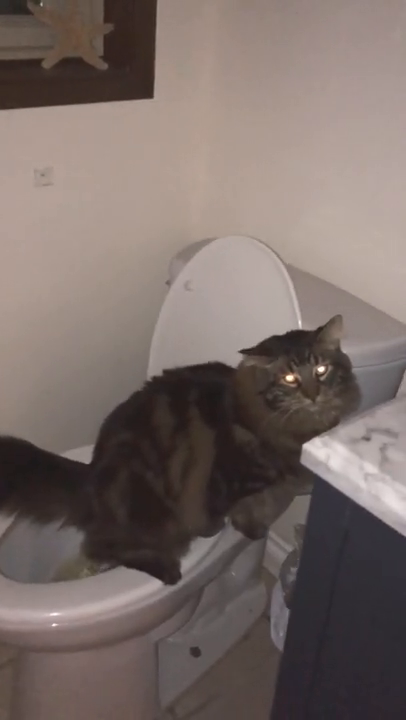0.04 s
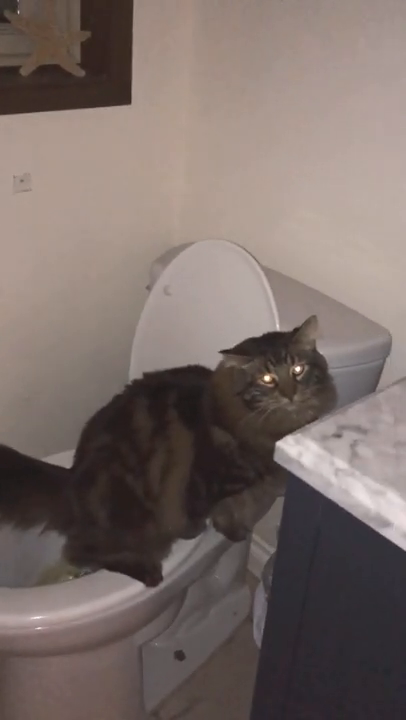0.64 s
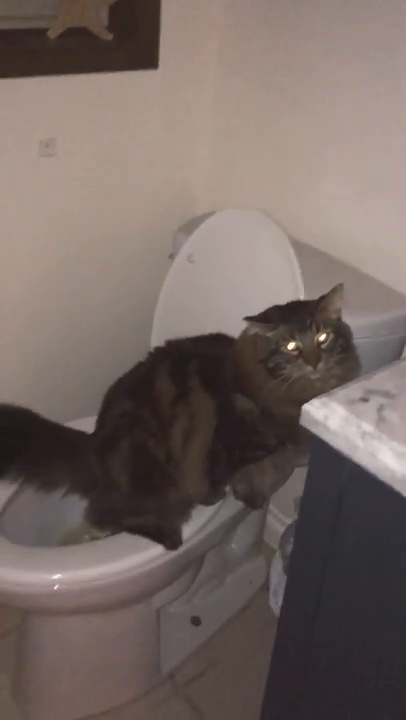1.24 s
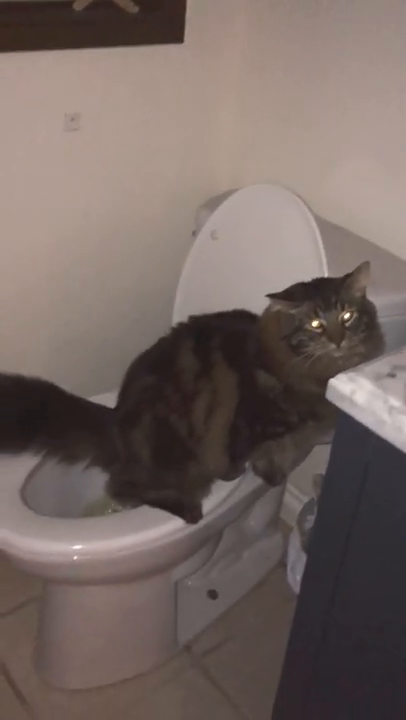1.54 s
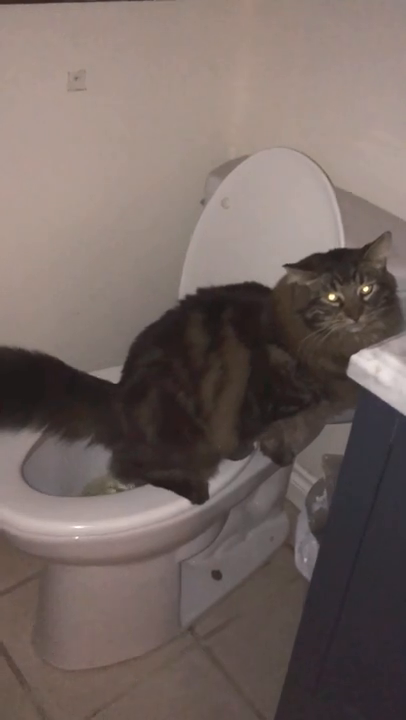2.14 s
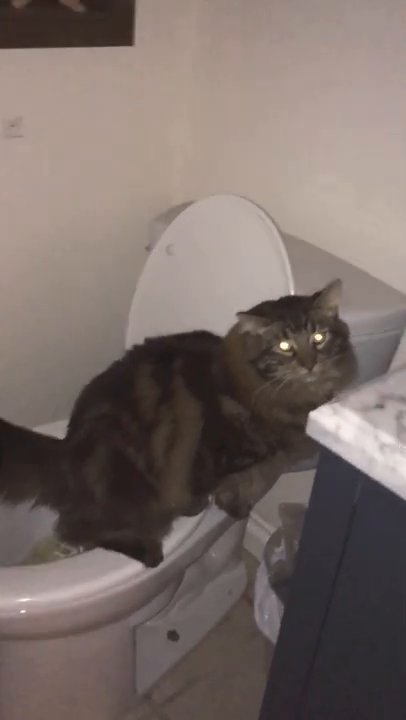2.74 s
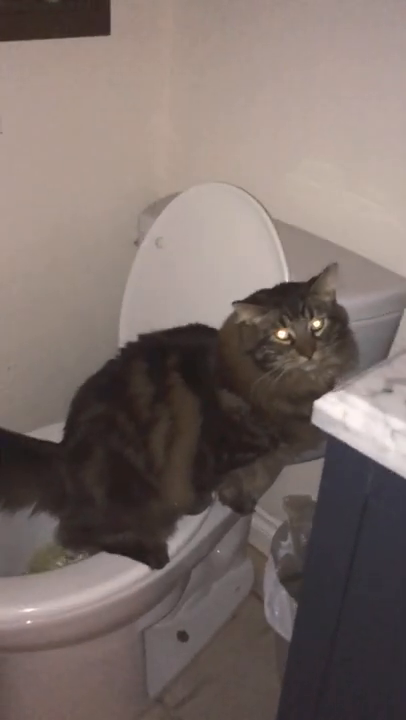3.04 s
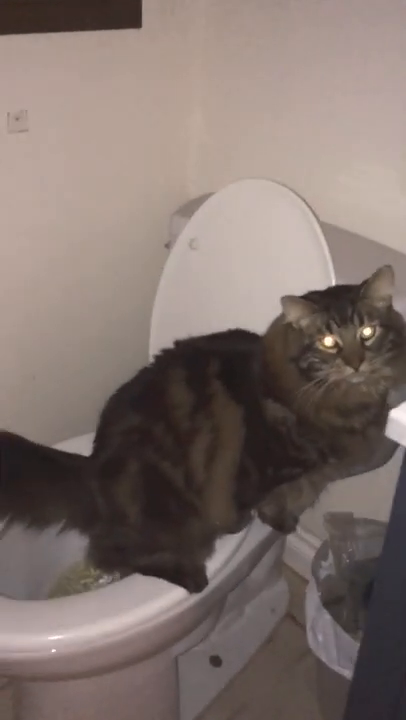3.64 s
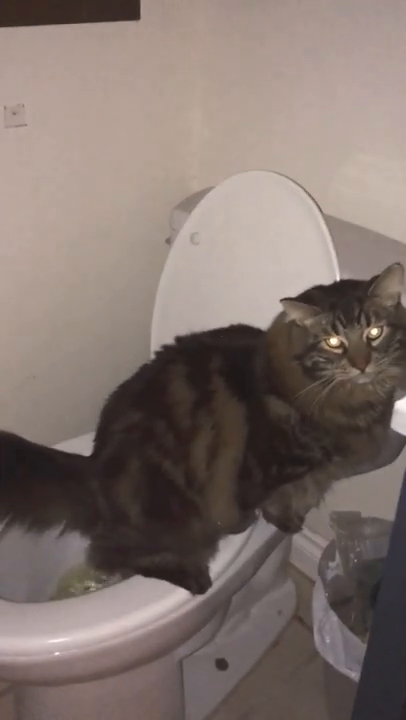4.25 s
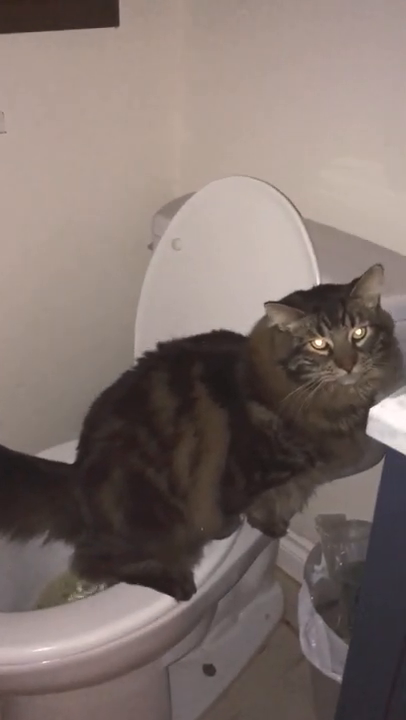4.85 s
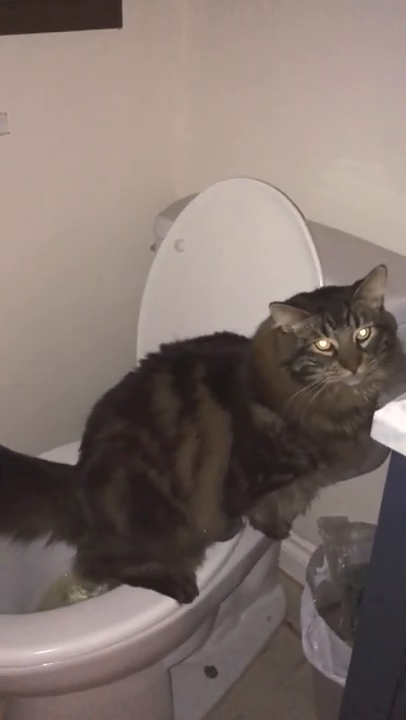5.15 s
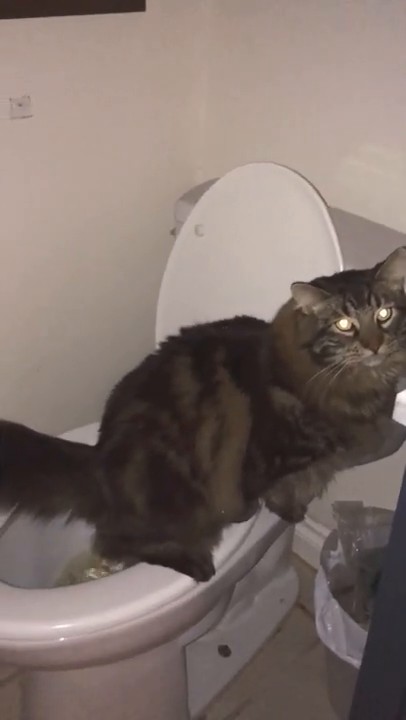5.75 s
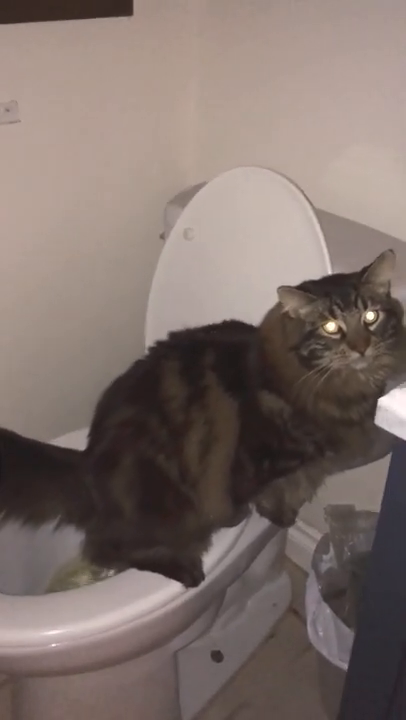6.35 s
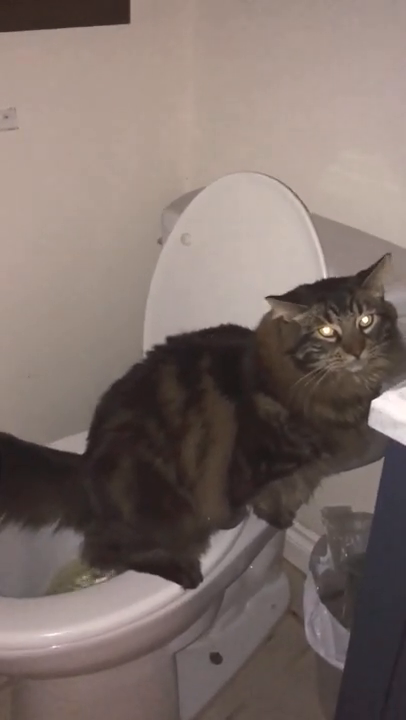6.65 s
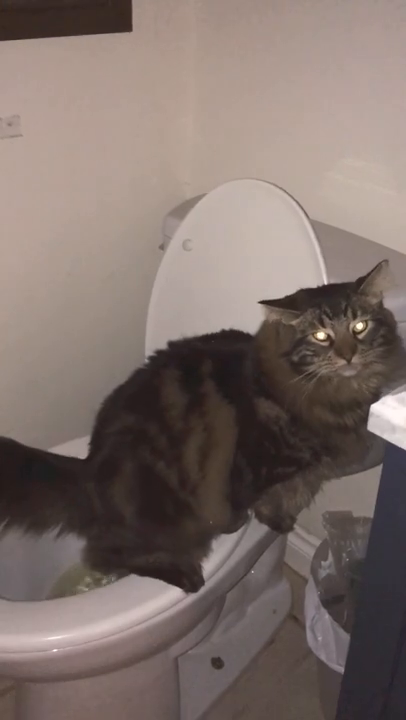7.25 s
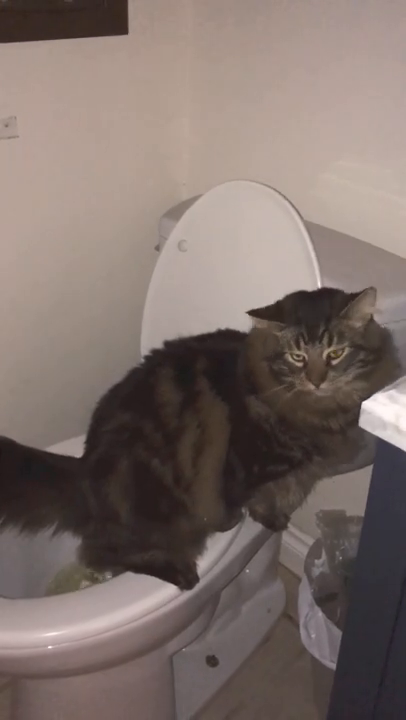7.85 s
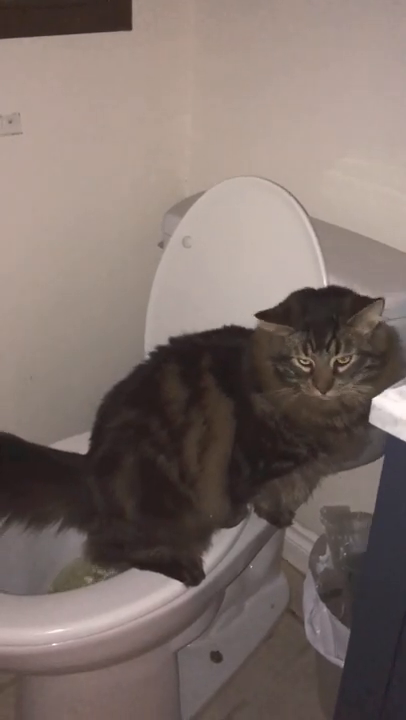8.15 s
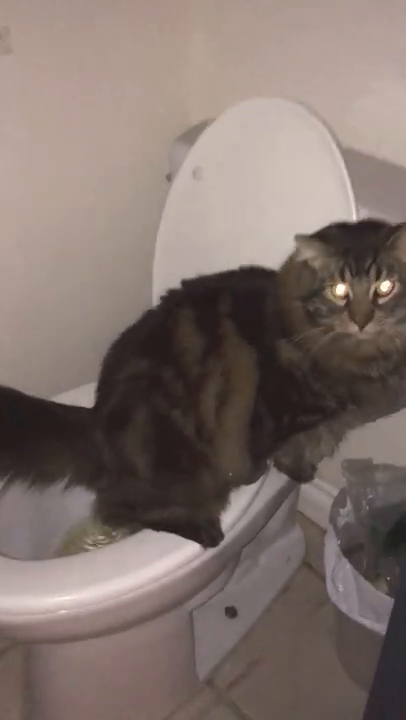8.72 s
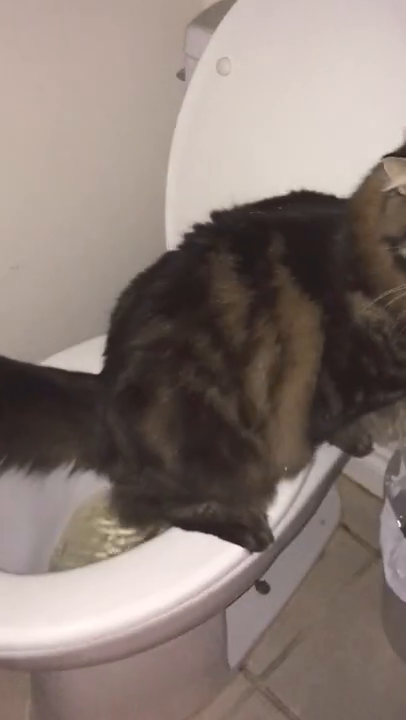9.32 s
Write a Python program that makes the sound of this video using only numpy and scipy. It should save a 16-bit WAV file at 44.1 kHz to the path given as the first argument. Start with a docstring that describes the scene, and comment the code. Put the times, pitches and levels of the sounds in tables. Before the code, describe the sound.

A cat pees into a toilet, a thin stream trickling, gurgling and ticking on the water in a small echoing bathroom.

```python
"""Water trickles, gurgles and ticks: a cat is peeing into a toilet in a small tiled bathroom.
The thin stream drags under strings of bubbles that ring and climb in pitch, and it breaks into
drops that tick on the water. The porcelain bowl and the walls echo it all over a faint room rumble.
A few dull knocks come through, and near the end something rustles softly.
We hear it from a hand-held phone a metre or so away."""
import sys
import numpy as np
from scipy import signal
from scipy.fft import rfft, irfft
from scipy.io import wavfile

SR = 44100
rng = np.random.default_rng(int(sys.argv[2]) if len(sys.argv) > 2 else 0)


def digitize_waveform(pressure):
    """Quantize a signal to 16-bit integers and store it at the path in sys.argv[1].

    Rows of a 2-D input are taken as channels; values are limited to [-1, 1].
    """
    field = np.atleast_2d(pressure).T
    bounded = np.clip(field, -1, 1)
    quanta = np.round(bounded * 32767).astype(np.int16)
    wavfile.write(sys.argv[1], SR, quanta)


N = 418068
TIME = np.arange(N) / SR

# The tone of the stream slapping the water. Each row: frequency in Hz, relative level in dB.
SLAP_TONE = [(700, 11), (1500, 14), (3200, -0.5), (5500, -1), (16000, -28)]
# A large bubble and the string of smaller ones it sheds.
# Each row: start in seconds, length in seconds, rough first pitch in Hz, relative level in dB.
GURGLE_EVENTS = [(0.171, .02, 1150, -43), (0.206, 0.046, 1350, -41.5), (0.357, 0.093, 1384, -49),
                 (0.604, 0.024, 1015, -51), (0.614, 0.047, 1384, -43), (0.72, 0.024, 1450, -42.5),
                 (0.903, 0.026, 1240, -47.5), (0.942, .05, 986, -48.5), (1.164, 0.025, 917, -52.5),
                 (1.265, 0.032, 1120, -42), (1.418, 0.024, 1347, -52), (1.622, 0.046, 1005, -45.5),
                 (1.855, 0.11, 1474, -50.5), (2.013, 0.079, 1270, -45), (2.285, 0.062, 1024, -47.5),
                 (2.617, 0.033, 1200, -51), (2.718, 0.03, 1002, -51), (3.11, 0.022, 1164, -46.5),
                 (3.193, 0.032, 1133, -44.5), (3.366, 0.06, 1286, -48), (3.492, 0.037, 1470, -49),
                 (3.635, 0.057, 944, -48.5), (3.69, 0.041, 1069, -42.5), (3.743, 0.012, 1383, -41.5),
                 (3.882, 0.043, 1390, -42.5), (4.056, 0.03, 1394, -48), (4.145, 0.039, 911, -43.5),
                 (4.328, 0.035, 1220, -47.5), (4.496, 0.09, 1445, -45), (4.593, 0.041, 1046, -37),
                 (4.701, 0.016, 1377, -39), (4.782, 0.03, 1097, -45.5), (5.025, 0.041, 1145, -37),
                 (5.15, 0.063, 877, -46), (5.338, 0.037, 1103, -45), (5.619, 0.053, 1317, -45),
                 (5.752, 0.04, 1190, -46), (5.808, 0.022, 1102, -40.5), (6.0644, 0.047, 1175, -41.5),
                 (6.285, 0.031, 914, -47), (6.429, 0.064, 1058, -44.5), (6.642, 0.029, 1184, -42),
                 (6.977, 0.036, 1097, -48.5), (7.047, 0.027, 1374, -41), (7.173, 0.026, 1144, -46.5),
                 (7.243, 0.025, 1118, -45.5), (7.341, 0.036, 1416, -47.5), (7.412, 0.067, 1151, -40),
                 (7.687, 0.035, 960, -44.5), (7.845, 0.1, 1485, -46.5), (7.988, 0.023, 1430, -45.5),
                 (8.119, 0.05, 1397, -42.5), (8.249, 0.028, 1315, -48), (8.356, 0.091, 1517, -45.5),
                 (8.463, 0.04, 1540, -39), (8.563, 0.034, 1096, -39.5), (8.657, .03, 1124, -41.5),
                 (8.865, 0.031, 1057, -43.5), (9.036, 0.015, 1270, -47), (9.07, 0.078, 1124, -44),
                 (9.252, 0.034, 1020, -47.5), (9.371, 0.013, 1235, -39)]

def gurgles(count=3, climb_octaves=.17, scatter_octaves=0.155, scatter_db=2):
    """The stream slaps the water and drags a bubble under; those it sheds shrink, so the pitch climbs."""
    rings, slaps = np.zeros(N), np.zeros(N)
    for start, length, hz, db in GURGLE_EVENTS:
        add(slaps, start, undb(db + 11) * burst(rng.standard_normal(512), t60=0.00049))
        add(rings, start, plop(hz, db, rng.standard_normal(3)))
        shed_db = db + 9 + 10 * np.log10(length / count)  # longer gurgles shed louder bubbles
        for k, (late, size, strength, *shape) in enumerate(rng.standard_normal((count, 6))):
            along = (k + 1 + 0.1524 * late) / count
            pitch = hz * 2 ** (climb_octaves * along + scatter_octaves * size)
            ring = plop(pitch, shed_db + scatter_db * strength, shape, cycles=55.6, rise=0.23)
            add(rings, start + along * length, ring)
    return rings + colour(slaps, SLAP_TONE)


def froth(pitch_ratio=1.645, gain_db=-13.0, delay_s=0.0051, linger_s=.05):
    """Each gurgle stirs up weak, small bubbles that linger a moment after it."""
    out = np.zeros(N)
    for start, length, hz, db in GURGLE_EVENTS:
        bubbles = swarm(hz * pitch_ratio, db + gain_db, count=8, span_s=min(length + linger_s, .15),
                        octaves=1.16, climb=0.15, cycles=26)
        add(out, start + delay_s, bubbles)
    return out


# Spurts of the stream. Each row: start in seconds, middle pitch in Hz, relative level in dB.
SPURTS = [(0.237, 1860, -41), (0.421, 2150, -44), (0.858, 2050, -50), (1.285, 1960, -54), (2.06, 2290, -55),
          (3.192, 3750, -39.5), (3.7, 2230, -50.5), (4.034, 1680, -46.5), (4.514, 2600, -49.5),
          (4.937, 2500, -47.5), (5.17, 1600, -47), (6.44, 2030, -50), (6.718, 2060, -42),
          (6.866, 2030, -40), (7.049, 2020, -43.5), (7.878, 2330, -47.5), (8.464, 1920, -47.5),
          (8.716, 1870, -41)]

def splashes(gain_db=5):
    """A thicker stretch of the stream churns the water into a swarm of small bubbles."""
    out = np.zeros(N)
    for start, hz, db in SPURTS:
        bubbles = swarm(hz, db + gain_db, count=10, span_s=.028, octaves=0.68, climb=0.73, cycles=32)
        add(out, start, bubbles)
    return out


# The larger drops that hit the water. Each row: start in seconds, pitch of the ping in Hz,
# relative level of the ping in dB, relative level of the tick in dB.
DROP_HITS = [(.072,6100,-49,-53),(.3152,11500,-42.5,-39),(.352,11000,-60,-48),(.415,3930,-50.5,-44.5),(.721,4140,-53,-53.5),(.977,12200,-43,-39.5),
             (1.305,9200,-54,-62),(1.324,12800,-41,-41),(1.987,7200,-53,-49.5),(2.041,3100,-54,-47),(2.065,2740,-48,-49.5),(2.0966,4750,-51.5,-53),
             (2.2503,9600,-47,-49),(2.353,3640,-63,-58),(2.432,2830,-50,-48),(3.0347,3820,-43.5,-50),(3.2108,5780,-39.5,-41.5),(3.487,5930,-52,-48.5),(3.6007,13400,-48,-50),
             (3.855,6750,-51,-56),(3.882,6900,-57,-49.5),(4.1527,6500,-50,-47),(4.311,4470,-54,-49),(4.5386,15000,-48,-57),(4.542,5100,-49,-48),
             (4.603,12600,-57,-46.5),(4.7016,12900,-51,-44),(4.93,8500,-46,-49.5),(5.051,6400,-58.5,-47.5),(5.3994,6800,-54.5,-46.5),(5.4657,8100,-58,-45.5),
             (5.862,3320,-51.5,-51.5),(5.9238,3700,-45.5,-41.5),(6.0646,6750,-65,-45.5),(6.1477,12300,-47,-45),(6.4335,13700,-48.5,-60),(6.446,2860,-57.5,-50),
             (6.5973,4640,-43.5,-51),(6.7574,2930,-58,-48),(6.814,11600,-50,-48),(7.0615,6150,-50.5,-51),(7.089,2780,-56,-60),(7.341,4550,-48.5,-50.5),(7.5294,5840,-44.5,-38),
             (7.8,6500,-48,-49),(7.8423,3300,-50.5,-49.5),(7.9176,7550,-52,-41.5),(7.9803,6100,-48,-44.5),(8.066,4630,-47,-49.5),(8.1735,6200,-59,-56),
             (8.251,3840,-55,-43),(8.3886,3800,-53,-48),(8.636,11200,-54,-58),(8.69,11600,-44.5,-40),(9.2437,11500,-50,-55),(9.2856,10000,-51.5,-62),
             (9.3005,7900,-63,-57),(9.3313,9000,-48,-46.5),(9.372,12900,-57,-47),(9.4663,3920,-47,-43.5)]

def drops(ping_t60_s=0.0022, tick_t60_s=0.0035, snap_delay_s=0.012, snap_db=-6.5):
    """A drop ticks as it lands and leaves a tiny pinging bubble; then its crater snaps shut."""
    out = np.zeros(N)
    noises = rng.standard_normal((len(DROP_HITS), 3, 512))
    for (start, hz, ping_db, tick_db), noise in zip(DROP_HITS, noises):
        ping = bubble(hz, cycles=ping_t60_s * hz, rise=0.0041, swell=2.3)
        add(out, start, undb(ping_db + 29.5) * unit(ping))
        # the smaller the drop, the higher its ping and the thinner its tick
        edges_hz = np.clip([0.62 * hz, 2.98 * hz], 1, SR * .45)
        band = signal.butter(2, edges_hz, "band", fs=SR, output="sos")
        tick, snap = (unit(signal.sosfilt(band, burst(n, tick_t60_s))) for n in noise[:2])
        gain = undb(tick_db + 25.5)
        add(out, start, gain * tick)
        add(out, start + snap_delay_s * np.exp(.5 * noise[2, 0]), gain * undb(snap_db) * snap)
    return out


# Bubbles that ring out alone. Each row: start in seconds, rough pitch in Hz, relative level in dB.
LONE_BUBBLES = [(.025,1273,-51.5),(.253,2920,-45.5),(.296,11000,-44.5),(.445,1140,-47.5),(0.765,9050,-54),(.865,1880,-50),(.885,6300,-55),(1.0,940,-51.5),(1.064,5840,-49.5),
                (1.183,1290,-49.5),(1.374,7600,-48.5),(1.485,2590,-44.5),(1.704,6070,-55),(1.749,10600,-52),(1.935,3600,-53),(2.159,6100,-48),(2.175,1813,-44),
                (2.213,9000,-48.5),(2.245,1416,-49),(2.404,3020,-50.5),(2.459,13800,-44),(2.505,6100,-54),(2.682,4060,-47.5),(2.848,6300,-53),(2.898,11800,-49.5),
                (3.169,10400,-51),(3.241,12600,-41.5),(3.323,4940,-40.5),(3.335,1530,-49),(3.514,9000,-48.5),(3.806,5600,-54.5),(3.9418,9560,-38.5),
                (4.0715,6540,-54),(4.195,5560,-48.5),(4.204,3370,-50.5),(4.283,6600,-54),(4.379,6100,-54.5),(4.455,2550,-55.5),(4.83,9130,-34.5),(4.844,1054,-46.5),
                (5.075,1100,-53),(5.087,13000,-46),(5.099,1550,-41),(5.184,8600,-49),(5.183,1485,-45.5),(5.292,7800,-52),(5.323,9400,-48),(5.451,1400,-45.5),(5.59,1082,-49),
                (5.9236,8600,-37.5),(5.97,3430,-47),(6.101,2910,-44.5),(6.154,5940,-48),(6.247,4320,-50),(6.275,11700,-50),(6.52,2670,-55),(6.597,2870,-46),
                (6.601,1490,-49.5),(6.674,8700,-50.5),(6.729,2690,-47),(6.768,1890,-43.5),(6.9677,12000,-46),(7.03,3570,-51),(7.197,12000,-50),(7.249,2820,-53),(7.455,1007,-44.5),(7.487,4250,-52.5),
                (7.5634,5150,-56),(7.634,4080,-50.5),(7.888,2400,-49),(7.9,5600,-49.5),(8.114,3370,-48.5),(8.296,5800,-50),(8.3495,5500,-50.5),(8.399,1033,-45),(8.527,7400,-52),(8.533,13700,-51),
                (8.62,3570,-50),(8.7876,6500,-45),(9.119,1120,-44.5),(9.202,2680,-55.5),(9.205,5900,-53),(9.269,12600,-53),(9.313,5460,-51)]

def plinks():
    """Single bubbles glide up as they near the surface; the low ones ring longer."""
    out = np.zeros(N)
    for (start, hz, db), shape in zip(LONE_BUBBLES, rng.standard_normal((len(LONE_BUBBLES), 3))):
        add(out, start, plop(hz, db, shape, cycles=42 * np.sqrt(2700 / hz), rise=0.335, gain_db=27))
    return out


# Chirping bubbles. Each row: start and length in seconds, first and last pitch in Hz, level in dB.
SURFACE_BUBBLES = [(4.098, 0.0286, 2550, 3200, -52), (4.933, .034, 1845, 3850, -42)]

def chirps():
    """A bubble caught right at the surface sweeps steeply upward."""
    out = np.zeros(N)
    for start, length, first_hz, last_hz, db in SURFACE_BUBBLES:
        hz = np.geomspace(first_hz, last_hz, int(length * SR))
        envelope = np.sin(np.linspace(0, np.pi, len(hz)))
        add(out, start, undb(db) * envelope * np.sin(2 * np.pi * np.cumsum(hz) / SR))
    return out


# How strong the stream is. Each row: time in seconds, relative level of the fine splashing in dB.
STREAM_STRENGTH = [(0,-58),(2.2,-55),(2.7,-59.5),(4.6,-58),(8.6,-57),(9.48,-56.5)]

def trickle(count, low_hz, high_hz, lean, cycles, rise, scatter_db, gain_db):
    """Many weak bubbles ring, louder when the stream is stronger; `lean` above 1 favours low pitches."""
    out = np.zeros(N)
    for when, size, strength in rng.random((count, 3)):
        start = when * N / SR
        hz = low_hz * (high_hz / low_hz) ** (size ** lean)
        db = curve(STREAM_STRENGTH, start) + gain_db + scatter_db * (strength ** 2 - 0.5)
        add(out, start, undb(db) * bubble(hz, cycles, rise))
    return out


# The bright tone of the spray. Each row: frequency in Hz, relative level in dB.
SPRAY_TONE = [(1000, -3), (3000, -23), (5000, -14.5), (8500, 3.5), (16000, 9)]

def spray(count=2000, scatter_db=19, gain_db=19):
    """Fine droplets fall back and prickle on the water."""
    clicks = np.zeros(N)
    when, strength = rng.random((count, 2)).T
    clicks[(when * N).astype(int)] = undb(scatter_db * (strength ** 5 - 0.5))
    return colour(clicks, SPRAY_TONE) * undb(curve(STREAM_STRENGTH, TIME) + gain_db)


# The notes the porcelain bowl rings at, lowest first. Each row: pitch in Hz, relative level in dB.
BOWL_NOTES = [(916,0),(1050,-5.5),(1100,6),(1398,-1.5),(1463,4.5),(1700,7),(1761,4.5),(2642,12),(2855,9),(3767,4),(5382,-10),(8514,11),(8870,15),(9153,8)]

def bathroom(x, echo_s=.0033, drift_hz=8.2, lowest_note_t60_s=0.32):
    """Sound arrives directly, bounces and rings inside the bowl, and echoes off the tiled walls."""
    t = np.arange(SR // 2) / SR
    scatter, walls = rng.standard_normal((2, len(t)))
    bounces = scatter * fade(t, 0.038)
    # the walls' echo sets in almost at once, and its treble dies first
    low = signal.sosfilt(signal.butter(1, 3500, fs=SR, output="sos"), walls)
    tail = low * fade(t, 0.31) + (walls - low) * fade(t, 0.19)
    tail *= 1 - np.exp(-t / 0.000063)
    ringing = np.zeros(len(t))
    for (hz, db), shift in zip(BOWL_NOTES, drift_hz * rng.standard_normal(len(BOWL_NOTES))):
        t60 = lowest_note_t60_s * np.sqrt(BOWL_NOTES[0][0] / hz)  # higher notes die sooner
        ringing += undb(db) * fade(t, t60) * np.sin(2 * np.pi * (hz + shift) * t)
    response = undb(-2) * unit(bounces) + undb(-5) * unit(ringing) + undb(5.5) * unit(tail)
    response[0] += 1  # the direct sound
    response[int(echo_s * SR)] += undb(-2)  # the echo off the far side of the bowl
    return signal.fftconvolve(x, unit(response))[:N]


def swaying_echoes(x, stretches=7):
    """The phone sways and the cat shifts, so each stretch of sound gets slightly different echoes."""
    out = np.zeros(N)
    for part in np.array_split(np.arange(N), stretches):
        add(out, part[0] / SR, bathroom(x[part]))
    return out


# Faint knocks. Each row: start in seconds, relative level in dB.
KNOCK_HITS = [(4.315, -51.5), (4.412, -49.5), (8.335, -49)]
# Their dull tone. Each row: frequency in Hz, relative level in dB.
KNOCK_TONE = [(60, -13), (130, 8.5), (300, -13), (570, 0), (900, 1.5), (3000, -29)]

def knocks(t60=0.11, gain_db=21.0):
    """A few soft bumps, each a short puff of low noise."""
    out = np.zeros(N)
    for (start, db), noise in zip(KNOCK_HITS, rng.standard_normal((len(KNOCK_HITS), 4096))):
        add(out, start, undb(db + gain_db) * burst(noise, t60))
    return colour(out, KNOCK_TONE)


# The tone of the rustle. Each row: frequency in Hz, relative level in dB.
RUSTLE_TONE = [(100, -12), (250, -3.5), (2600, -3.5), (6000, -13.5), (16000, -11)]
# How the rustle swells. Each row: time in seconds, typical level in dB.
RUSTLE_SWELL = [(0, -100), (8.1, -67.5), (8.35, -64), (8.6, -59), (8.85, -60.5), (9.0, -55), (9.045, -51),
                (9.09, -58.5), (9.48, -70)]

def rustle(flutter_db=3.5):
    """A soft noise that flutters unevenly and is loudest near the end."""
    steps = rng.standard_normal(512)
    flutter = np.interp(TIME, np.linspace(0, N / SR, len(steps)), steps)
    level_db = curve(RUSTLE_SWELL, TIME) + flutter_db * flutter
    return colour(rng.standard_normal(N), RUSTLE_TONE) * undb(level_db)


# The tone of the quiet room. Each row: frequency in Hz, relative level in dB.
ROOM_TONE = [(26, -12), (44, -1.5), (70, 0), (150, -7.5), (315, -7.5), (400, -13), (800, -17),
             (2000, -25.5), (6000, -26), (16000, -35)]

def room_rumble(db=-68.0):
    """A steady low rumble with a little hiss."""
    return undb(db) * colour(rng.standard_normal(N), ROOM_TONE)


def bubble(hz, cycles, rise, swell=1):
    """A bubble swells, then fades by 60 dB over `cycles` vibrations, rising as it nears the surface."""
    age = np.arange(int(cycles * SR / hz) + 2) * hz / (cycles * SR)  # runs from 0 to 1
    envelope = (1 - np.exp(-age * cycles / swell)) * fade(age, 1)
    return np.sin(2 * np.pi * cycles * (age + rise * age ** 2 / 2)) * envelope / envelope.max()


def plop(hz, db, shape, cycles=60, rise=0.299, spread=0.408, gain_db=27.5):
    """One bubble pinches off; three random numbers in `shape` vary its ring time, glide and swell."""
    length, glide, ease = shape
    ring = bubble(hz * 0.98, cycles * np.exp(spread * length), rise * np.exp(spread * glide),
                  swell=0.71 * np.exp(.5 * ease))
    return undb(db + gain_db) * unit(ring)


def swarm(hz, db, count, span_s, octaves, climb, cycles, scatter_db=3, fade_db=7):
    """Bubbles tear loose, pitched around hz; late ones tend to be smaller, so higher and weaker."""
    out = np.zeros(SR // 4)
    for k, (jitter, size, strength) in enumerate(rng.random((count, 3))):
        late = (k + jitter) / count
        pitch = hz * 2 ** (octaves * (size - .5) + climb * (late - .5))
        ring = bubble(pitch, cycles, rise=0.12)
        i = int(late * span_s * SR)
        out[i:i + len(ring)] += undb(db - scatter_db * strength - fade_db * late) * ring
    return out


def burst(noise, t60):
    """A quickly dying puff of noise with an energy of one."""
    return unit(noise * fade(np.arange(len(noise)) / SR, t60))


def fade(t, t60):
    """A smooth decay that has dropped by 60 dB when t reaches t60."""
    return np.exp(-np.log(1000) * t / t60)


def colour(x, tone):
    """Shape the lows and highs of x with a tone table; white noise keeps its power."""
    hz, db = np.transpose(tone)
    log_hz = np.log(np.fft.rfftfreq(len(x), 1 / SR) + 1)
    gain = undb(np.interp(log_hz, np.log(hz), db))
    return irfft(rfft(x) * gain / np.sqrt(np.mean(gain ** 2)), len(x))


def undb(db):
    """Turn decibels into a number to multiply by."""
    return 10 ** (np.asarray(db) / 20)


def curve(rows, t):
    """Read a table of times and values at times t."""
    return np.interp(t, *np.transpose(rows))


def unit(x):
    """Scale to an energy of one."""
    return x / np.sqrt(np.sum(x ** 2))


def add(out, start, x):
    """Mix x into out from `start` seconds on."""
    i = int(np.clip(start * SR, 0, N - 1))
    out[i:i + len(x)] += x[:N - i]


# How much of the drops and plinks gets straight out of the bowl: more once the phone leans over it.
# Each row: time in seconds, gain in dB.
DIRECT_SHARE = [(8.7,-20.5),(9.25,-6.5)]

def scene(bass_cut_hz=800):
    """All that happens in the bowl echoes round the room; drops and plinks also arrive with no echo."""
    babble = trickle(count=700, low_hz=1045, high_hz=3810, lean=1.29,
                     cycles=34.6, rise=0.16, scatter_db=3, gain_db=8)
    fizz = trickle(count=1000, low_hz=2970, high_hz=15000, lean=0.65,
                   cycles=11.3, rise=0.063, scatter_db=15, gain_db=12.0)
    drips = drops() + plinks()
    water = gurgles() + froth() + splashes() + chirps() + undb(-1.38) * drips + babble + fizz + spray()
    # such small bubbles give off no bass
    water = signal.sosfilt(signal.butter(4, bass_cut_hz, "high", fs=SR, output="sos"), water)
    echoing = swaying_echoes(water + knocks())
    direct = drips * undb(curve(DIRECT_SHARE, TIME))
    return (echoing + direct + rustle() + room_rumble())[None]


def record(dry):
    """The phone cuts the treble above 15900 Hz."""
    return signal.sosfilt(signal.ellip(10, .2, 70, 15900, fs=SR, output="sos"), dry)


dry = scene()
out = record(dry)
digitize_waveform(out)
```